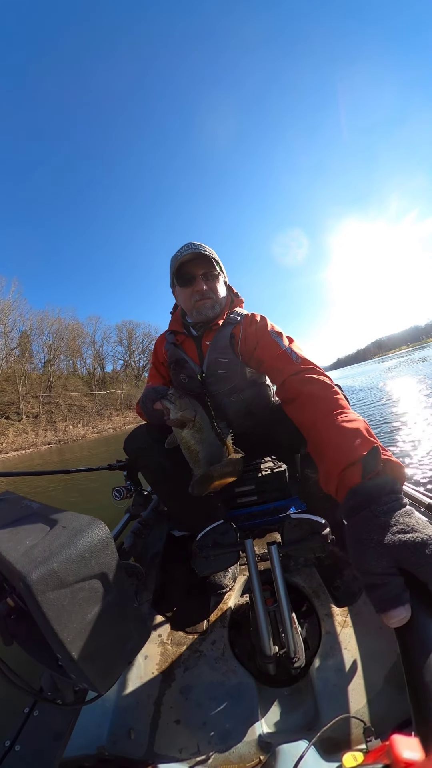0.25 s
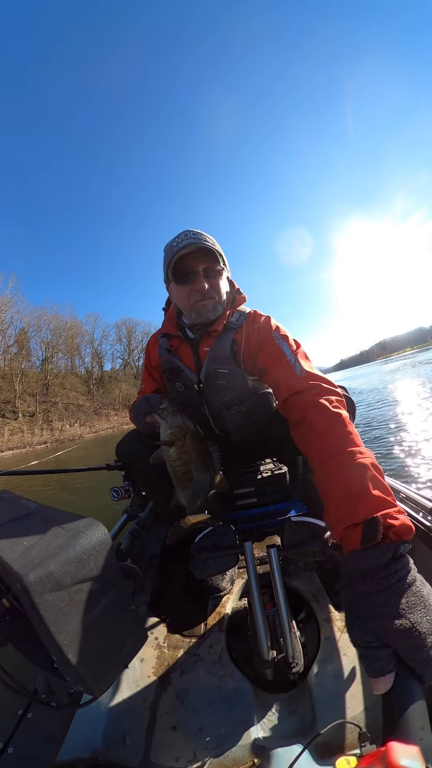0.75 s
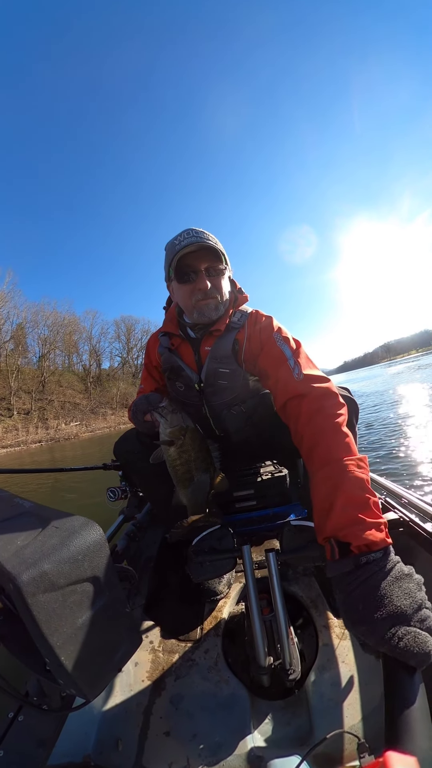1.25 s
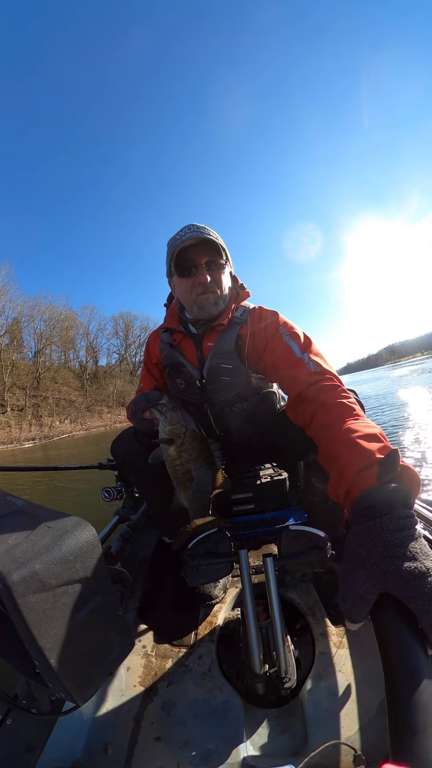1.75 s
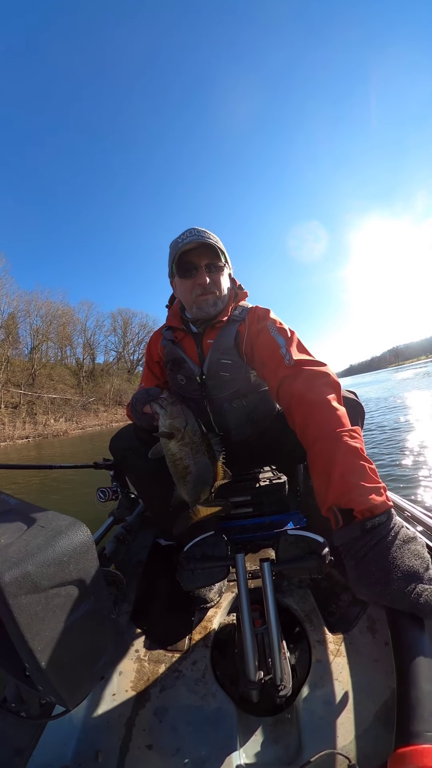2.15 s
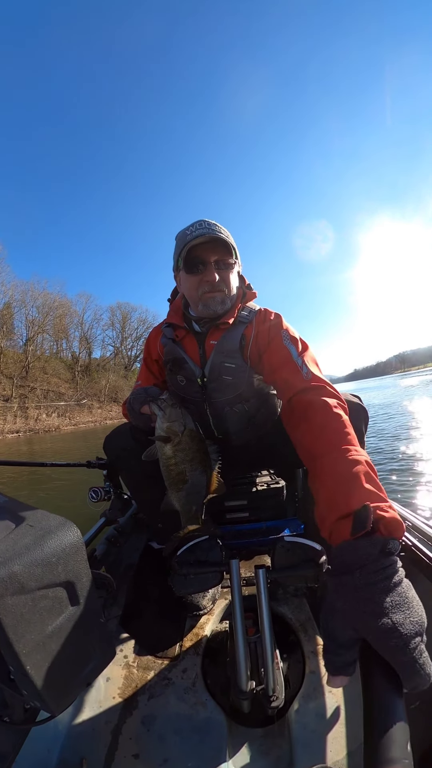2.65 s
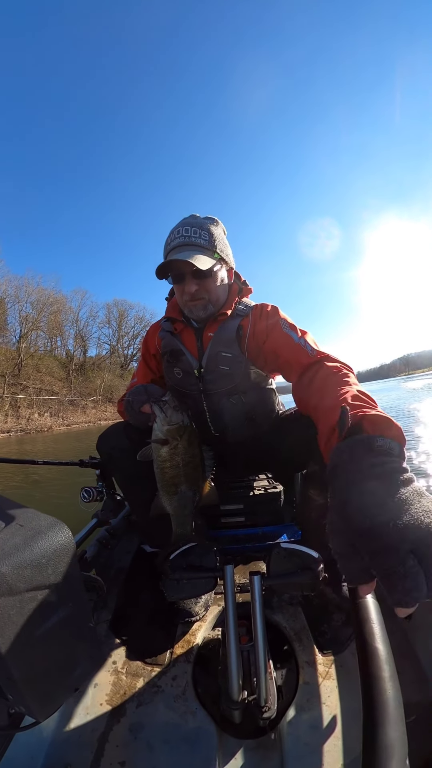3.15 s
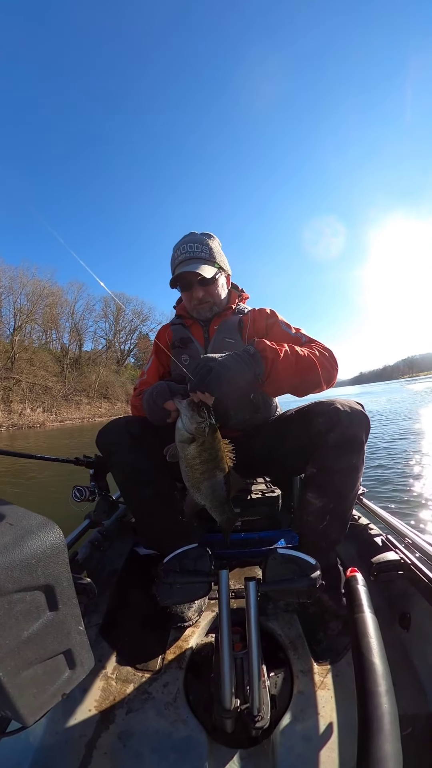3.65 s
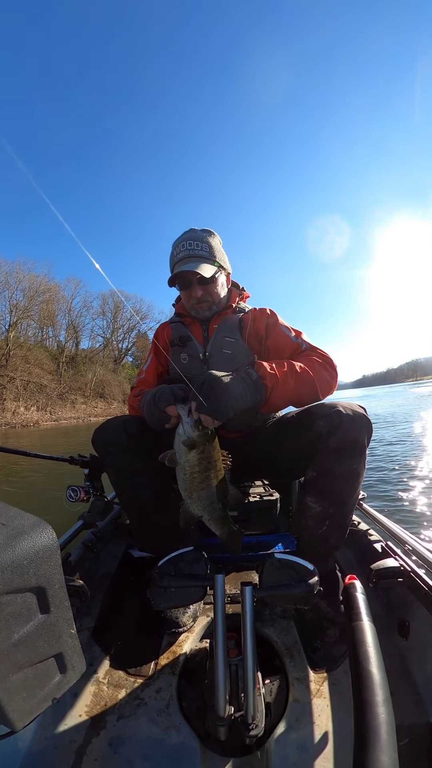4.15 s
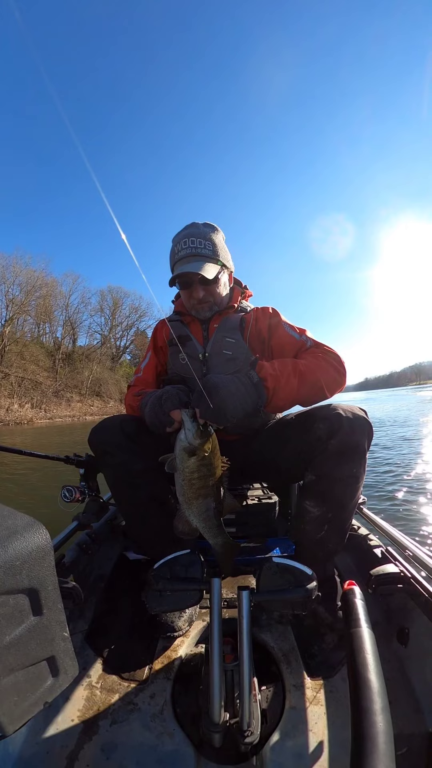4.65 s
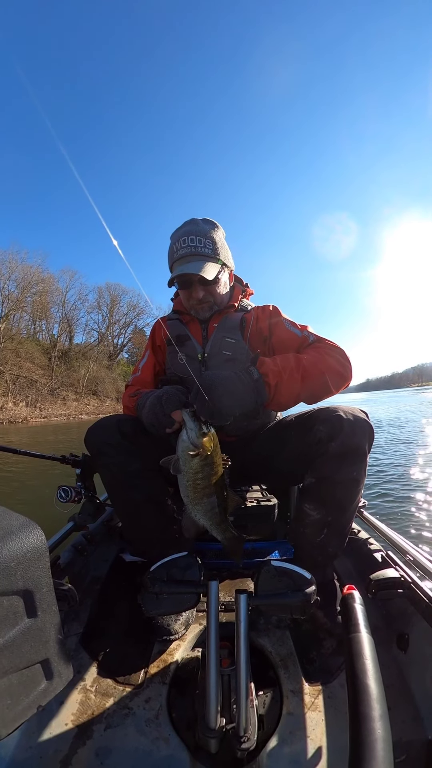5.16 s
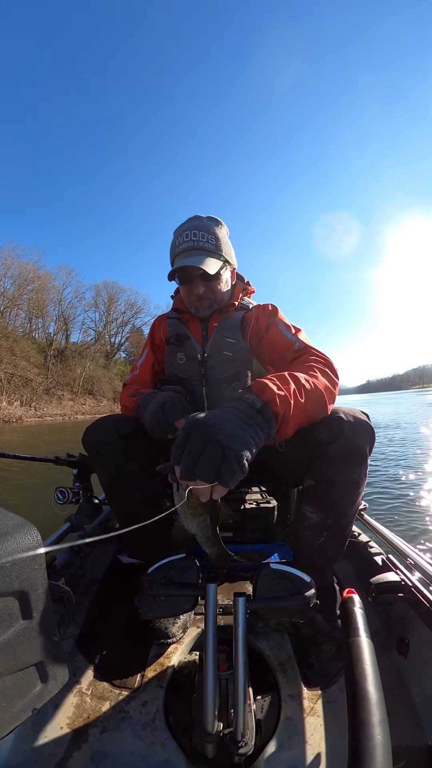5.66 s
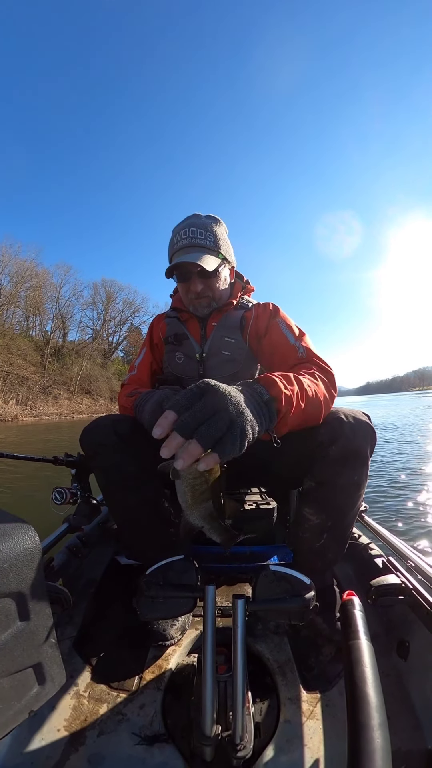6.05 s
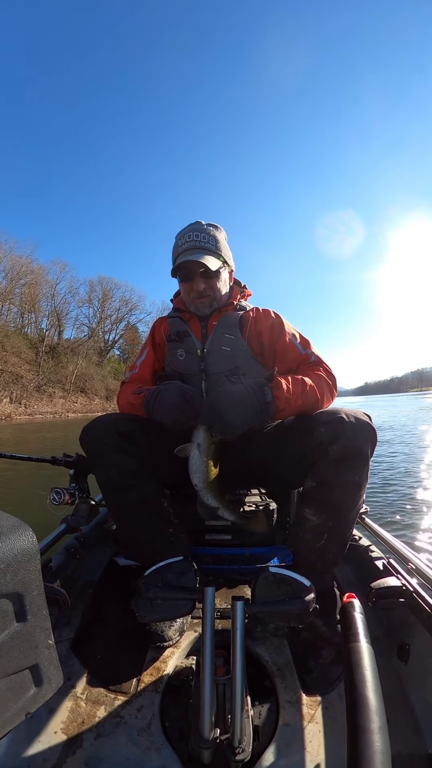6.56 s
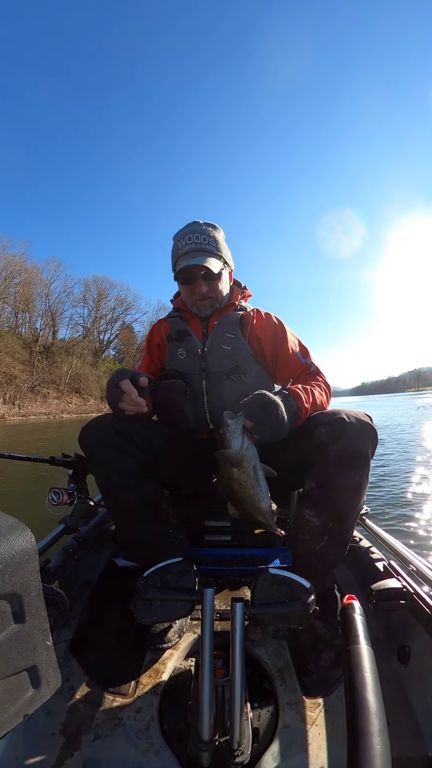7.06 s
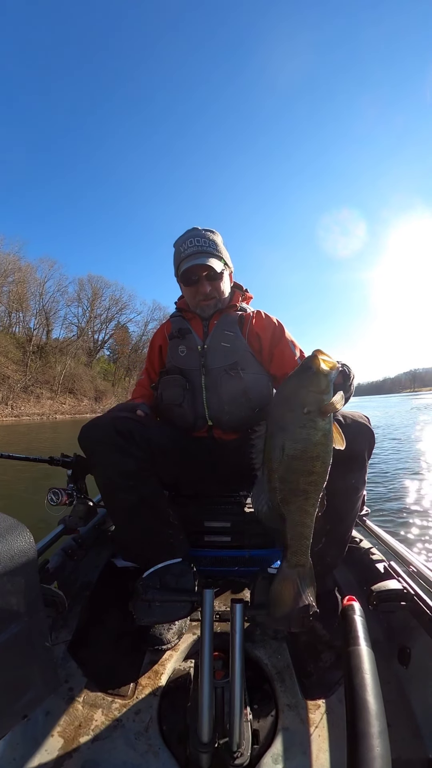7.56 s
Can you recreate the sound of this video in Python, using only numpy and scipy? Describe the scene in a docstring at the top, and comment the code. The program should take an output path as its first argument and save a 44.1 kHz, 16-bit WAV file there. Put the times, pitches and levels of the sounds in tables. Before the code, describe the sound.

Close handling bumps thud through a plastic hull while a jacket rustles; a hook snaps free and a fish smacks wetly amid buffeting wind.

```python
"""Unhooking a fish in a kayak

An angler in a plastic kayak adjusts the pole that carries the microphone, then unhooks a fish.
Struck parts (hull, pole, latch, hook, fish) ring as fading sine waves; scrapes and slips are shaped noise.
A stiff jacket rustles as grainy noise that follows the arms; the fish gives one wet slap.
Wind rumbles on the microphone over the soft wash of the lake, both made of coloured noise."""
import sys
import numpy as np
from scipy import signal
from scipy.fft import rfft, irfft, next_fast_len
from scipy.io import wavfile

SR = 44100
rng = np.random.default_rng(int(sys.argv[2]) if len(sys.argv) > 2 else 0)


def persist_wave(psi):
    """Save psi, clipped to +-1, as 16-bit WAV."""
    counts = np.round(np.clip(psi, -1, 1) * 32767).astype(np.int16)
    wavfile.write(sys.argv[1], SR, np.atleast_2d(counts).T)


N = 344244
TIME = np.arange(N) / SR
AGE = np.arange(SR // 3) / SR  # time axis of one short contact, in seconds
LEAD_S = 1 / 20  # a scrape or creak starts this long before its peak

# Arm movements that slide the jacket fabric. Each row: start in seconds, length in seconds,
# strength in dB (the swish adds its own lift), fine hiss in dB relative to that strength.
MOVES = [(0.0, 0.028, -55.5, -21), (0.192, 0.11, -59.5, -33), (0.492, 0.32, -60, -20.5),
         (0.75, 0.22, -56.5, -27), (1.08, 0.21, -64.5, -23), (1.392, .01, -66, -16),
         (1.669, 0.23, -64.5, -21), (1.942, 0.15, -55, -21.5), (2.551, .02, -65, -18),
         (2.698, 0.092, -57, -22), (3.0, 0.14, -67, -18), (3.248, 0.11, -58, -21),
         (3.443, 0.03, -60.5, -21), (4.506, .14, -72.5, -18), (5.423, 0.25, -78, -18),
         (5.79, 0.041, -67.5, -13), (6.176, 0.15, -54.5, -17.5), (6.38, .12, -59.5, -21),
         (6.555, 0.78, -65, -21), (6.96, 0.052, -60.5, -20), (7.279, 0.14, -57.5, -20),
         (7.495, 0.26, -62, -17.5)]
MOVE_ATTACK_S, MOVE_RELEASE_S = 0.038, 0.065

# Tone of sliding fabric. Each row: frequency in Hz, relative level in dB.
SWISH_COLOUR = [(500, 6.5), (1200, 6.5), (2200, 3.5), (3500, -0.5), (5300, -6), (7000, -10), (8500, -18.5),
                (10500, -29.5), (15500, -53)]

# Cutoff of the scrapes: a blunt bump scrapes more dully than a slip in the mount.
SCRAPE_TOP_HZ, SLIP_TOP_HZ = 5200, 10000

# The moment the pole seats itself
SEAT_S = 2.7258


def undb(db):
    """Turn decibels into gain."""
    return 10 ** (np.asarray(db) / 20)


def unit(x):
    """Scale to an rms (average strength) of 1."""
    return x / np.sqrt(np.mean(x ** 2))


def curve(table, column):
    """Read one column of a control table at every sample, with straight lines between rows."""
    rows = np.array(table)
    return np.interp(TIME, rows[:, 0], rows[:, column])


def colour(x, points):
    """Give x a spectrum of (Hz, dB) points that falls 20 dB per octave beyond its ends; rms 1."""
    hz, db = np.transpose(points)
    size = next_fast_len(len(x))
    octave = np.log2(np.maximum(np.arange(size // 2 + 1) * SR / size, 1))
    below = np.maximum(np.log2(hz[0]) - octave, 0)
    above = np.maximum(octave - np.log2(hz[-1]), 0)
    gain = undb(np.interp(octave, np.log2(hz), db) - 20 * (below + above))
    return unit(irfft(rfft(x, size) * gain, size)[:len(x)])


def resonate(x, hz, q):
    """Pass x through one resonance with gain 1 at its centre; a higher q is narrower."""
    return signal.lfilter(*signal.iirpeak(min(hz, SR / 3), max(q, 1), fs=SR), x)


def lowpass(x, order, hz):
    """Soften x above the given frequency."""
    return signal.sosfilt(signal.butter(order, hz, fs=SR, output="sos"), x)


def walk(rate):
    """Wander along straight lines between random values, `rate` values per second."""
    steps = rng.standard_normal(N // 100)
    return np.interp(TIME * rate, np.arange(len(steps)), steps)


def grains(size, spread_db):
    """Make noise from countless tiny contacts of very unequal strength."""
    boost = np.minimum(rng.exponential(size=size), 2 * np.pi)  # capped, so no grain sticks out too far
    return unit(rng.standard_normal(size) * undb(spread_db * boost))


def swell(t, rise_s, fall_s):
    """Grow exponentially up to t = 0 and decay after it."""
    return np.exp(-np.where(t < 0, -t / rise_s, t / fall_s))


def ring(modes, contact_s, weight_db=0, damping=1):
    """Ring fading modes after one blow, peak 1; the push builds up over the contact time."""
    hz, db, t60 = np.transpose(modes)
    hz = hz * (1 + .005 * rng.standard_normal(len(hz)))  # no two blows ring quite alike
    # neighbouring modes swing in opposite senses
    size = undb(db + weight_db) * (-1) ** np.arange(len(hz))
    waves = np.sin(2 * np.pi * np.outer(hz, AGE))
    fades = np.exp(-np.log(1000) * np.outer(damping / t60, AGE))
    y = size @ (waves * fades)
    y = y * (1 - np.exp(-AGE / contact_s))
    return y / np.abs(y).max()


def add(out, s, sound):
    """Mix a sound in, starting at s seconds."""
    start = int(s * SR)
    start, sound = max(start, 0), sound[max(-start, 0):]
    out[start:start + len(sound)] += sound[:max(N - start, 0)]


def wind():
    """Eddies buffet the microphone: low noise whose level rises, falls and flutters."""
    # Gusts. Each row: time in seconds, level in dB before the 2 dB lift and the flutter below.
    gusts = [(0.0, -42), (0.19, -37.5), (0.46, -46.5), (0.87, -36.5), (1.2, -37), (1.54, -46), (1.9, -44),
             (2.24, -34.5), (2.54, -40.5), (3.6, -40.5), (4.1, -48), (4.6, -50), (4.75, -41), (5.38, -38),
             (5.76, -43.5), (6.3, -37.5), (6.68, -41.5), (7.03, -35), (7.81, -39)]
    # Tone of the rumble. Each row: frequency in Hz, relative level in dB.
    rumble_colour = [(8.8, -30.5), (15, 4.5), (55, -1), (130, -9.5), (169, -30.5), (230, -20), (390, -35),
                     (419, -30), (500, -31), (650, -48), (1100, -120)]
    buffet_db = 1.5 * walk(11)
    return colour(rng.standard_normal(N), rumble_colour) * undb(curve(gusts, 1) + 2.0 + buffet_db)


def lake():
    """Far ripples and wind in bare trees: a soft, nearly even wash."""
    # Tone of the wash. Each row: frequency in Hz, relative level in dB.
    wash_colour = [(100, 2.5), (250, 5.5), (600, -5), (1200, -2.5), (1700, -9), (2500, -22.5),
                   (3500, -49.5), (5300, -35.5), (8000, -40.5), (13000, -48.5), (15500, -59)]
    level_db = -56.5 + 0.96 * walk(2.0) + 0.38 * walk(26)
    return colour(rng.standard_normal(N), wash_colour) * undb(level_db)


def gestures(rows, attack_s, release_s, rest_db):
    """Strength of (start, length, dB) movements: each builds up, holds, lets go and settles; powers add."""
    settle_db, settle_s = -6.5, 0.18  # after a movement the last part dies away slowly
    power = undb(rest_db) ** 2
    for s, length, db in rows:
        before = np.maximum(s - TIME, 0)
        after = np.maximum(TIME - s - length, 0)
        settling = undb(settle_db) * np.exp(-after / settle_s)
        release = np.maximum(np.exp(-after / release_s), settling)
        power = power + (undb(db) * np.exp(-before / attack_s) * release) ** 2
    return np.sqrt(power)


def jacket(arm):
    """Stiff fabric slides in fine catches and uneven scuffs; gloves rub dully on the pole and fish."""
    # Tone of the fine hiss. Each row: frequency in Hz, relative level in dB.
    sheen_colour = [(9000, -6), (12500, -4), (15500, -20)]
    # Tone of the rubbing gloves. Each row: frequency in Hz, relative level in dB.
    rub_colour = [(70, -21), (130, -2), (280, -6), (450, -20.5), (900, -21.5), (1800, -40.5)]
    # Glove rubs. Each row: start in seconds, length in seconds, level in dB before flutter.
    grips = [(0.17, .06, -45.5), (0.87, 0.26, -49.5), (1.5, 0.58, -50.5), (2.08, 0.12, -42.5),
             (2.32, 0.12, -51.5), (2.88, 0.2, -48), (3.33, 0.065, -45), (5.5, .5, -58), (7.3, 0.38, -52.5)]
    hiss_rows = [(s, length, db + hiss_db) for s, length, db, hiss_db in MOVES]
    hiss = gestures(hiss_rows, MOVE_ATTACK_S, MOVE_RELEASE_S, rest_db=-103)
    swish = colour(grains(N, spread_db=2.5), SWISH_COLOUR) * undb(3.0)
    sheen = colour(grains(N, spread_db=2.5), sheen_colour) * hiss
    # each fold catches by itself and has its own pitch
    scuffs = np.zeros(N)
    for hz in (1400, 2100, 3350, 4850):
        fold = unit(resonate(grains(N, spread_db=4.5), hz, q=7.2))
        scuffs += fold * undb(-16.5 + 3.4 * np.minimum(walk(55), 2))
    scuffs = lowpass(scuffs, 4, 7000)
    grip = gestures(grips, attack_s=0.067, release_s=0.051, rest_db=-56.5)
    rub = colour(grains(N, spread_db=3.5), rub_colour) * grip * undb(1.9 * walk(35))
    return undb(1.85 * walk(60)) * (arm * (swish + scuffs) + sheen) + rub


def push(hz):
    """The first give of a struck surface: about one cycle, peak near 1."""
    cycles = hz * AGE
    return np.sin(2 * np.pi * cycles) * np.exp(-(2 * cycles - 1) ** 2)


def dent(hz):
    """A blow dents the shell, favours the modes near its own pitch and chatters for a few cycles."""
    # Ways the shell rings. Each row: frequency in Hz, relative level in dB, time to fade 60 dB in seconds.
    shell_modes = [(127, 7.5, 0.062), (172.3, 4.5, 0.15), (208.3, -5, 0.22), (261.5, -2, 0.11),
                   (304.7, -12, 0.15), (382, -5.5, 0.073), (562, -5, 0.023), (611, -12, 0.08),
                   (790, -5, 0.039), (987, -1, 0.024), (1160, -8.5, 0.049)]
    octaves_away = np.abs(np.log2(np.array(shell_modes)[:, 0] / hz))
    body = ring(shell_modes, contact_s=0.00046, weight_db=-8 * octaves_away)
    chatter = unit(resonate(resonate(rng.standard_normal(len(AGE)), hz, 1), hz, 1))
    chatter = chatter * np.exp(-AGE * hz / 4.2)
    return undb(-1.5) * body + undb(-5.0) * push(hz) + undb(-11.5) * chatter


def scrape(fall_s, hz, top_hz):
    """A contact breaks free with a tick, then grinds; the tick comes LEAD_S into the sound."""
    # Tone of grinding grit. Each row: frequency in Hz, relative level in dB.
    grit_colour = [(200, 14), (900, 3.5), (1400, 1), (2300, -3.5), (3500, -5), (5000, -9), (6800, -15),
                   (8500, -22.5), (10500, -25.5), (12500, -44), (15500, -53)]
    t = AGE - LEAD_S
    grit = colour(grains(len(AGE), spread_db=4), grit_colour)
    grit = unit(grit + resonate(grit, hz, q=3))
    grind = grit * swell(t, rise_s=fall_s / 3.3, fall_s=fall_s)
    age = np.maximum(t, 0)
    tick = np.sin(2 * np.pi * hz * age) * np.exp(-age / 0.0022) * (1 - np.exp(-age / .0004))
    return lowpass(grind + undb(0.5) * tick, 2, min(top_hz, SR / 3))


def hull():
    """Each bump dents the shell and scrapes it; a moment later the shell rocks back at one low pitch."""
    # Bumps. Each row: time in seconds, level in dB, pitch of the modes struck hardest in Hz,
    # scrape level in dB.
    bumps = [(0.0, -29.5, 132, -55), (0.19, -35, 925, -53), (0.214, -26, 700, -58),
             (0.226, -27.5, 154, -51), (0.2617, -18.5, 208, -39), (0.318, -31.5, 910, -44),
             (0.710, -27.5, 373, -54), (0.725, -28.5, 367, -55), (0.784, -25, 246, -37),
             (0.856, -24.5, 755, -35), (0.865, -28, 850, -49), (0.984, -28, 383, -47.5),
             (1.098, -33, 910, -45), (1.975, -26.5, 790, -52), (2.059, -27.5, 206, -52),
             (2.16, -18, 243, -42), (2.209, -27, 273, -43), (2.246, -32.5, 280, -47.5),
             (2.311, -28, 290, -51), (2.383, -32.5, 300, -43), (2.423, -39.5, 570, -54.5),
             (2.523, -41.5, 940, -61), (2.746, -21, 270, -53), (3.034, -25, 380, -58),
             (3.042, -31, 436, -57), (3.285, -25, 340, -48), (3.349, -17.5, 228, -41),
             (3.394, -36, 1100, -54), (3.519, -35.5, 1010, -52), (6.493, -46, 590, -43.5),
             (7.367, -28.5, 1110, -48), (7.385, -31, 172, -52)]
    rebound_s, rebound_db, rebound_hz = 0.01316, -6.5, 184  # delay, level against the bump, pitch
    out = np.zeros(N)
    for s, db, hz, scrape_db in bumps:
        add(out, s, undb(db) * dent(hz))
        add(out, s + rebound_s, undb(db + rebound_db) * dent(rebound_hz))
        add(out, s - LEAD_S, undb(scrape_db) * scrape(fall_s=0.014, hz=1710, top_hz=SCRAPE_TOP_HZ))
    return out


def pole():
    """The pole flexes with a low thud when jolted, and slips grittily in its mount."""
    # Ways the pole flexes. Each row: frequency in Hz, relative level in dB, time to fade 60 dB in seconds
    # when free.
    flex_modes = [(73.3, 6, 0.049), (106.4, 5.5, 0.13), (116, 0.5, 0.144), (139.5, -5, 0.095)]
    # Jolts. Each row: time in seconds, peak level in dB, damping by the hand (1 = free, more fades faster).
    jolts = [(0.747, -14.5, 1.9), (0.784, -16, 0.96), (0.847, -16, 2.5), (1.185, -28.5, 0.86),
             (2.055, -27, 0.94), (2.7258, -26.5, 0.69), (2.76, -20, 2.5), (3.494, -35, 2.9)]
    # Slips. Each row: time in seconds, level in dB, fall time in seconds, ringing pitch in Hz.
    slips = [(0.039, -39.5, 0.003, 2090), (0.089, -44.5, 0.017, 2140), (0.199, -46.5, 0.0055, 4600),
             (0.746, -38, 0.01, 3600), (0.753, -36, 0.017, 1760), (0.781, -28, 0.026, 2460),
             (0.794, -22, 0.0052, 1360), (0.803, -31, 0.0047, 1250), (0.831, -35.5, 0.017, 4600),
             (0.855, -33, 0.0089, 3700), (0.906, -35.5, 0.0041, 1890), (0.947, -38, 0.0098, 1520),
             (1.139, -46, 0.039, 2620), (1.198, -39, 0.014, 2260), (1.247, -42, 0.011, 2350),
             (1.712, -45, 0.015, 2660), (1.852, -44.5, 0.0029, 3360), (2.713, -36, 0.015, 1150),
             (2.778, -40.5, 0.0069, 2700), (2.815, -45, 0.0045, 1400), (2.856, -46.5, 0.0027, 1600),
             (2.886, -53, 0.008, 5200), (2.998, -44, 0.011, 1760), (3.364, -42, 0.011, 2200),
             (7.327, -47, 0.0097, 3400)]
    out = np.zeros(N)
    for s, db, damping in jolts:
        add(out, s, undb(db) * ring(flex_modes, contact_s=0.0013, damping=damping))
    for s, db, fall_s, hz in slips:
        add(out, s - LEAD_S, undb(db) * scrape(fall_s, hz, SLIP_TOP_HZ))
    return out


def catches(arm):
    """Gloves catch on the pole and fish in random slips that follow the arm's strength."""
    per_s, let_go_s = 13, 3.55  # catches per second; the hand has left the pole after let_go_s
    level_db, spread_db, free_hand_db = 9, 3.5, -2  # against the arm's strength; softer with a free hand
    out = np.zeros(N)
    draws = rng.uniform(-1.1, 1, (int(N / SR * per_s), 3))
    for k, (when, size, pitch) in enumerate(draws):
        s = (k + 1 + when) / per_s
        db = level_db + spread_db * size + free_hand_db * (s > let_go_s)
        strength = np.interp(s, TIME, arm) * undb(db)
        hz = 1990 * 2 ** (pitch / 2)  # up to about half an octave either way
        add(out, s - LEAD_S, strength * scrape(0.0046, hz, SCRAPE_TOP_HZ))
    return out


def knock():
    """The pole seats itself: a hard crack, the short ring of its plastic latch, then a bottoming thud."""
    # Tone of the crack. Each row: frequency in Hz, relative level in dB.
    crack_colour = [(300, 4.5), (560, -1.5), (800, 10.5), (980, -8), (1150, 4), (1450, -10), (2200, -8.5),
                    (3200, -12), (3900, -21.5), (5900, -23), (7500, -28.5), (9800, -48), (12500, -45),
                    (15500, -60)]
    # Ways the latch rings. Each row: frequency in Hz, relative level in dB, time to fade 60 dB in seconds.
    latch_modes = [(250, -6, 0.12), (370, -8.5, 0.063), (483, -10.5, 0.042), (595, -25, 0.04),
                   (778, -6, 0.041), (1124, 0.5, 0.027), (1270, -4, 0.013), (2290, -18, 0.028),
                   (3160, -15, 0.021)]
    crack = swell(TIME - SEAT_S, rise_s=.0022, fall_s=.01)
    out = colour(grains(N, spread_db=1.5), crack_colour) * undb(-20) * crack
    add(out, SEAT_S, undb(-8.5) * ring(latch_modes, contact_s=.0002))
    add(out, 2.7295, undb(-11) * push(hz=115))
    return out


def tackle():
    """The hook creaks under load, then works free in sharp snaps with a brief hollow ring."""
    # Tone of a snap. Each row: frequency in Hz, relative level in dB.
    snap_colour = [(400, 11.5), (1300, 3), (2600, -3), (3300, -4.5), (4300, -2.5), (5800, -4), (8500, -15),
                   (10500, -19.5), (12000, -14.5), (15500, -29)]
    # Ways the hook rings. Each row: frequency in Hz, relative level in dB, time to fade 60 dB in seconds.
    hook_modes = [(490, -2, 0.086), (1290, 8, 0.031), (1530, 4, 0.016), (1740, -19, .012), (2260, 3, 0.019),
                  (2610, -4, 0.022), (3720, -9.5, 0.024), (4520, -9, 0.025), (5870, -21, .018)]
    # Clicks. Each row: time in seconds, ring peak in dB, snap level in dB,
    # pitch of the modes struck hardest in Hz.
    clicks = [(3.836, -50, -64, 2700), (4.205, -42.5, -50.5, 1700), (4.559, -37, -52, 2000),
              (4.948, -77, -66.5, 5600), (5.176, -40, -62.5, 1260), (5.207, -68, -59.5, 4300),
              (5.351, -23.5, -38.5, 1850), (5.456, -44, -50, 1900), (5.473, -61, -56.5, 4300),
              (6.929, -41.5, -71, 1270), (7.067, -41.5, -69, 1800), (7.699, -47, -63, 1300)]
    out, mode_hz, t = np.zeros(N), np.array(hook_modes)[:, 0], AGE - LEAD_S
    creak = undb(-8) * swell(t, rise_s=0.0071, fall_s=0.013)
    strain = swell(t, rise_s=0.00019, fall_s=0.0037) + creak
    for s, ring_db, snap_db, hz in clicks:
        snap = strain * colour(rng.standard_normal(len(AGE)), snap_colour)
        add(out, s - LEAD_S, undb(snap_db) * snap)
        weight_db = -7 * np.abs(np.log2(mode_hz / hz))
        add(out, s, undb(ring_db) * ring(hook_modes, contact_s=0.00016, weight_db=weight_db))
    return out


def fish():
    """The fish whips along the fabric in a swelling zip, smacks down wetly and quivers briefly."""
    # Tone of the wet splat. Each row: frequency in Hz, relative level in dB.
    slap_colour = [(80, -2), (170, 6), (320, -3), (450, -2.5), (560, 6.5), (780, -7), (950, 0), (1300, -5),
                   (1900, -20), (3000, -6), (5400, -12), (6900, -29), (8000, -44), (9800, -38),
                   (12500, -43), (15500, -62)]
    # Ways the slap rings. Each row: frequency in Hz, relative level in dB, time to fade 60 dB in seconds.
    smack_modes = [(138, -4.5, 0.16), (259, -2, 0.048), (342, 8, 0.042), (496, -10, 0.13), (591, -6, 0.075),
                   (887, -4, 0.049), (977, 2, 0.027), (1140, -3, 0.042), (1343, 1, 0.045),
                   (1555, -7, 0.049), (1660, -6, 0.06), (2190, -4, 0.035), (2560, -10, 0.035),
                   (3860, -10, 0.043), (4760, -14, 0.031), (5320, -12, 0.025), (6640, -12, 0.026)]
    # Three blows in quick succession, the last one softer. Each row: time in seconds, peak level in dB.
    slaps = [(6.2242, -9), (6.2256, -10), (6.2290, -13.5)]
    t = TIME - 6.2235
    zip_noise = colour(rng.standard_normal(N), SWISH_COLOUR)
    zip_tone = unit(resonate(resonate(rng.standard_normal(N), 1540, 13.6), 1540, 13.6))
    out = undb(-21) * zip_noise * swell(t, rise_s=.0075, fall_s=.006)
    out += undb(-24) * zip_tone * swell(t, rise_s=.01, fall_s=.004)
    splat = colour(rng.standard_normal(N), slap_colour)
    out += undb(-19.0) * swell(t, rise_s=0.0014, fall_s=0.01) * splat
    # the quivering body keeps the same modes alive; a mode's width follows from its ring time
    quiver = colour(rng.standard_normal(N), [(100, 2), (1000, 0), (2200, -9), (6500, -2), (9000, -30)])
    shiver = np.zeros(N)
    for k, (hz, db, t60) in enumerate(smack_modes):
        q = 0.6 * np.pi * hz * t60 / np.log(1000)
        shiver += undb(db) * resonate(quiver, hz, q) * (-1) ** k
    out += undb(-36.5) * unit(shiver) * swell(t, rise_s=0.0018, fall_s=0.055)
    # a brief falling chirp gives the slap its snap
    chirp_hz = 6000 * np.exp(-AGE / 0.0042)
    chirp = np.sin(2 * np.pi * np.cumsum(chirp_hz) / SR) * np.exp(-((AGE - .003) / 0.0059) ** 2)
    add(out, 6.2203, undb(-19.0) * chirp)
    for s, db in slaps:
        add(out, s, undb(db) * ring(smack_modes, contact_s=0.00035))
    add(out, 6.2248, undb(-17) * push(hz=282))
    return out


def cockpit(x):
    """The near walls of the hull mirror the treble after a few thousandths of a second."""
    # Reflections. Each row: delay in seconds, level in dB.
    walls = [(.0019, -16), (.0034, -14.5), (.0052, -16.5)]
    out = x.copy()
    treble = signal.sosfilt(signal.butter(2, 2830, "high", fs=SR, output="sos"), x)
    for delay_s, db in walls:
        add(out, delay_s, undb(db) * treble)
    return out


def scene():
    """Everything is close to one microphone on open water; only the hull reflects."""
    arm = gestures([move[:3] for move in MOVES], MOVE_ATTACK_S, MOVE_RELEASE_S, rest_db=-87)
    handling = jacket(arm) + hull() + pole() + catches(arm)
    events = knock() + tackle() + fish()
    return (wind() + lake() + cockpit(handling + events))[None]


def record(dry):
    """The recorder rounds the highest peaks and cuts the top of the treble."""
    ceiling, top_hz = .7, 15500
    treble_cut = signal.ellip(8, .2, 70, top_hz, fs=SR, output="sos")
    return signal.sosfilt(treble_cut, ceiling * np.tanh(dry / ceiling))


dry = scene()
out = record(dry)
persist_wave(out)
```